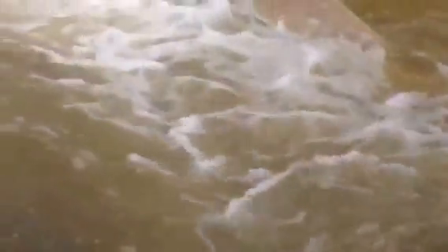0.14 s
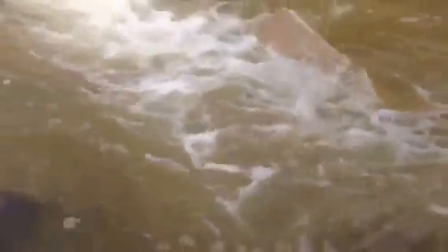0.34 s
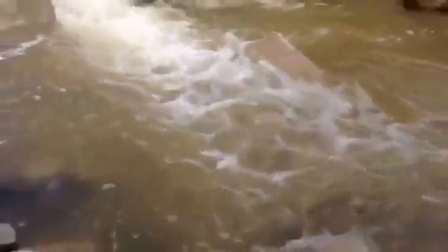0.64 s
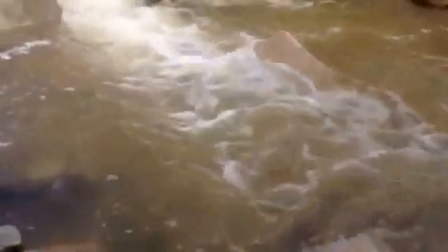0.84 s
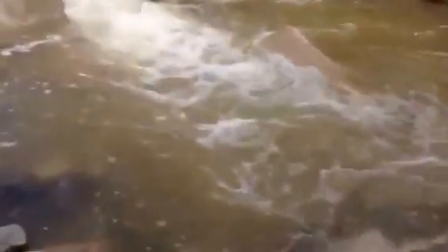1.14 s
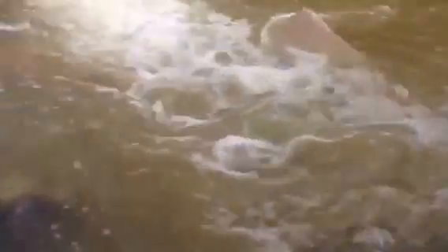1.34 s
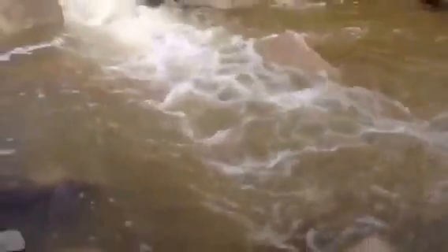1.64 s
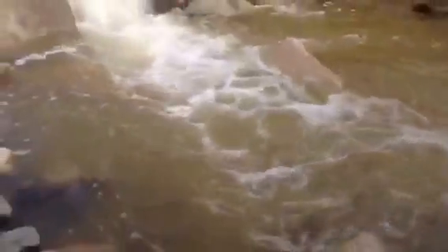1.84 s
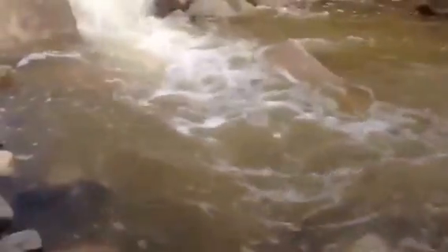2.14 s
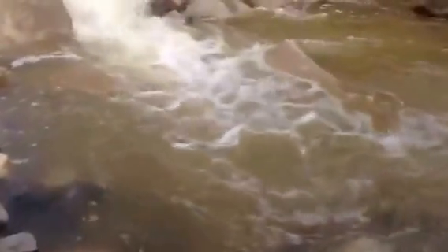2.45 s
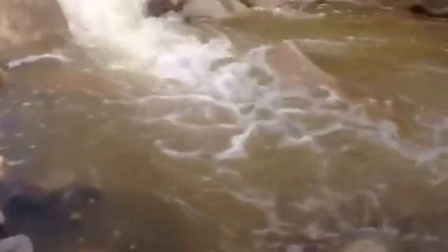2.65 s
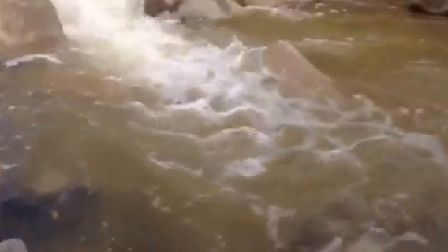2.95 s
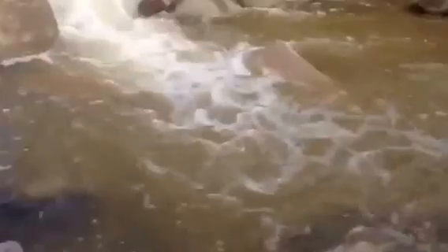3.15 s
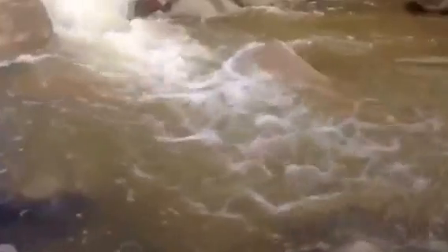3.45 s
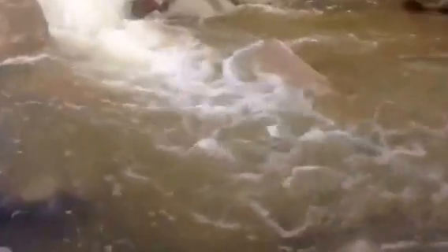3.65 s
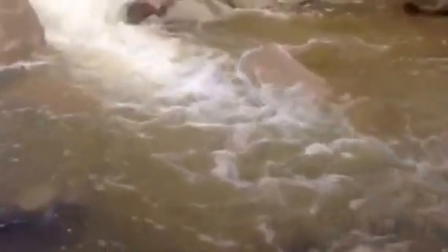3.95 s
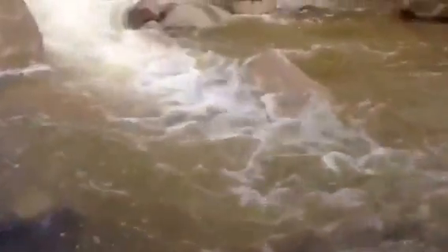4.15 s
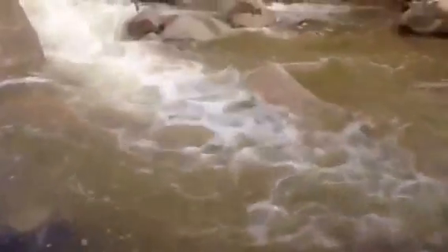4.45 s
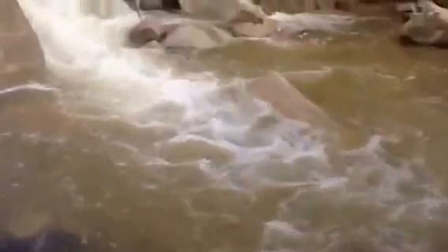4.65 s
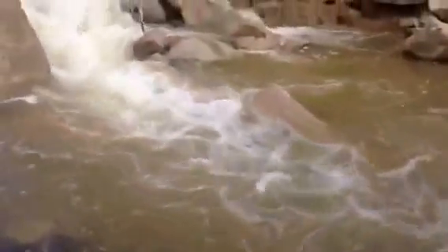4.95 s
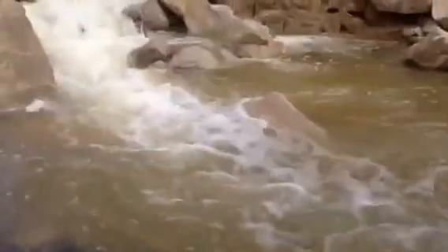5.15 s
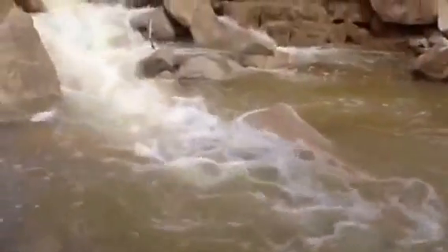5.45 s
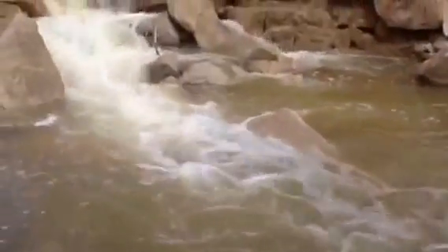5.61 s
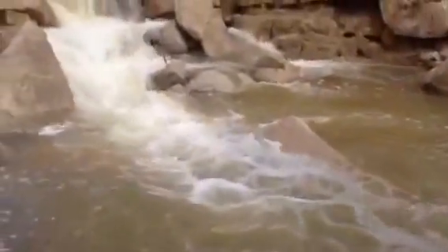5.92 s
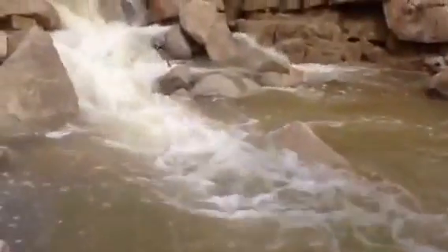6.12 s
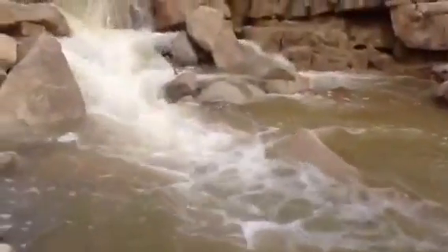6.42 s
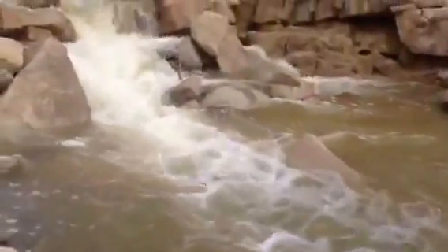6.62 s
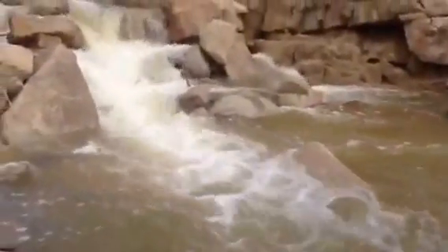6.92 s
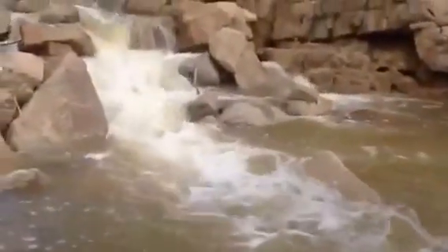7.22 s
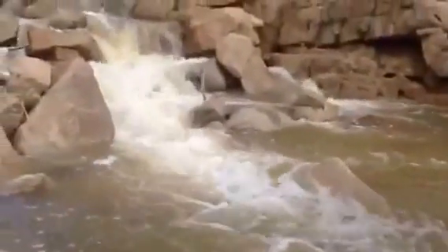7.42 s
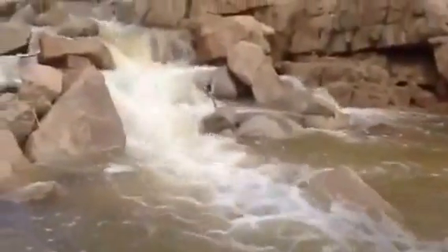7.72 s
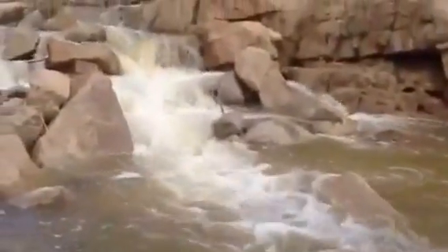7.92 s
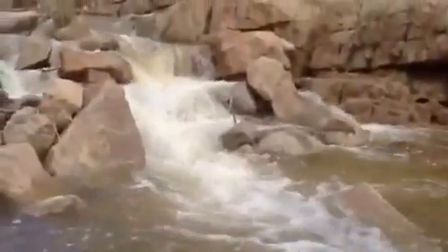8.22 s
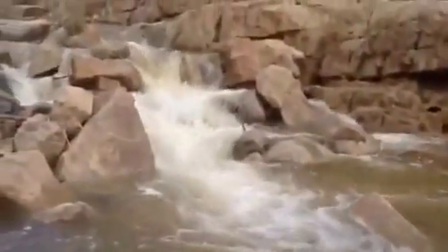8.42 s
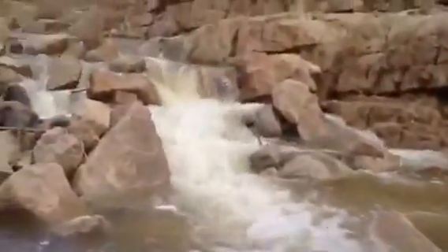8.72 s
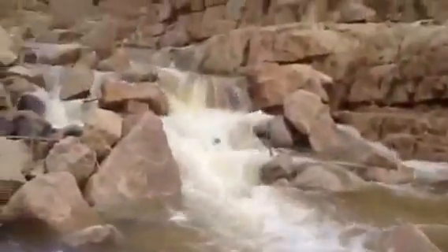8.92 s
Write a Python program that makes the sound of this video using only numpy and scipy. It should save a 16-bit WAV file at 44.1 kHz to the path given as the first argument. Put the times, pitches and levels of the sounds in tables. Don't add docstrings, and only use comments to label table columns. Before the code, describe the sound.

A steady torrent of muddy water pours over boulders into a churning pool. A low, airy roar sits beneath thick gurgling and smaller, busier bubbling, with fine spray hissing on top. It is already at full force at the start and never stops, only wavering slightly. Outdoors on the rocky bank, one small microphone, nearly mono and dry, with faint early reflections from nearby rocks and a dulled extreme top.

```python
import sys
import numpy as np
from scipy import signal
from scipy.fft import rfft, irfft, next_fast_len
from scipy.io import wavfile
from scipy.ndimage import uniform_filter1d, map_coordinates

SR = 44100
rng = np.random.default_rng(int(sys.argv[2]) if len(sys.argv) > 2 else 0)


def unload_audio(sound):
    columns = np.transpose(np.atleast_2d(sound))
    steps = np.round(np.clip(columns, -1, 1) * 32767)
    wavfile.write(sys.argv[1], SR, steps.astype(np.int16))


def elevation(decibels):
    levels = np.asarray(decibels, float)
    return 10 ** (levels / 20)


N = 399987


def unit(x):
    return x / np.sqrt(np.mean(x ** 2) + 1e-20)


def curve(rows):
    s, value = np.transpose(rows)
    return np.interp(np.arange(N) / SR, s, value)


def wobble(rate):
    knots = rng.standard_normal(int(N * rate / SR) + 4)
    return map_coordinates(knots, [np.arange(N) * rate / SR])


def coloured(x, spectrum):
    m = next_fast_len(N + 8192)
    hz, db = np.transpose(spectrum)
    log_hz = np.log(np.fft.rfftfreq(m, 1 / SR) + 1)
    gain = elevation(np.interp(log_hz, np.log(hz + 1), db))
    return unit(irfft(rfft(x, m) * gain, m)[:N])


def patchy(patch_db, drift_db):
    z = signal.stft(rng.standard_normal(N + 512), nperseg=512)[2]

    def blur(rows, cols):
        field = uniform_filter1d(rng.standard_normal(z.shape), rows, 0)
        return unit(uniform_filter1d(field, cols, 1))

    field_db = patch_db * blur(rows=8, cols=12) + drift_db * blur(rows=3, cols=250)
    return unit(signal.istft(z * elevation(field_db), nperseg=512)[1][:N])


def bubbles(count, low_hz, high_hz, cycles, spread_db, size):
    draw = rng.random((count, 3))
    hz = low_hz + (high_hz - low_hz) * draw[:, 1:2]
    turns = hz * np.arange(size) / SR
    tone = np.sin(2 * np.pi * turns * (1 + 0.031 * turns / cycles))
    envelope = np.exp(-turns / cycles) * (1 - np.exp(-turns / 0.55))
    strength = elevation(-spread_db * np.log(1 - .98 * draw[:, 2:])) * np.sqrt(hz)
    where = (draw[:, :1] * N).astype(int) + np.arange(size)
    return unit(np.bincount(where.ravel(), (tone * envelope * strength).ravel(), N + size)[:N])


def blend(noise, grains, share):
    share = np.clip(share, 0, 1)
    return np.sqrt(1 - share) * noise + np.sqrt(share) * grains


# frequency in Hz, level in dB per Hz.
ROAR_SPECTRUM = [(25, -33), (45, -24), (65, -11.5), (90, -11), (120, -4.5), (150, 0.5), (180, -0.5),
                 (230, -5.5), (300, -7.0), (370, -11.5), (417, -16), (443, -27), (473, -120.0)]


def roar(level_db):
    return elevation(level_db) * coloured(patchy(patch_db=0.34, drift_db=0.5), ROAR_SPECTRUM)


# frequency in Hz, level in dB per Hz.
GURGLE_SPECTRUM = [(387, -120.0), (417, -14), (443, -8), (490, -2), (560, -2.5), (660, -2), (745, 1.5),
                   (810, -1.5), (880, -0.5), (1000, -4.5), (1164, -6), (1236, -11.5), (1320, -120.0)]


def gurgle(level_db):
    bed = patchy(patch_db=.2, drift_db=.6)
    rings = bubbles(count=4000, low_hz=400, high_hz=1300, cycles=6, spread_db=1.2, size=900)
    return elevation(level_db) * coloured(blend(bed, rings, share=.04), GURGLE_SPECTRUM)


# frequency in Hz, level in dB per Hz.
CHURN_SPECTRUM = [(1080, -120.0), (1164, -5), (1236, 0), (1350, 1), (1500, 1), (1700, -0.5), (1950, -1),
                  (2200, -1), (2350, -2.5), (2550, -2.5), (2813, -5), (2987, -10), (3190, -120.0)]


def churn(level_db):
    bed = patchy(patch_db=.5, drift_db=.6)
    rings = bubbles(count=9000, low_hz=1100, high_hz=3100, cycles=6, spread_db=2, size=400)
    return elevation(level_db) * coloured(blend(bed, rings, share=.07), CHURN_SPECTRUM)


# frequency in Hz, level in dB per Hz.
SPRAY_SPECTRUM = [(2610, -120.0), (2813, -21), (2987, -2.5), (3300, -1), (3850, -1), (4300, -3.5),
                  (5150, -3), (5800, -7), (6300, -6), (7000, -6.5), (7800, -6), (8300, -8.5), (9200, -10),
                  (10200, -13.5)]


def spray(level_db, bright_db):
    bed = patchy(patch_db=0.67, drift_db=.6)
    drops = bubbles(count=25000, low_hz=2674, high_hz=10960, cycles=3.05, spread_db=2, size=110)
    hiss = coloured(blend(bed, drops, share=.15), SPRAY_SPECTRUM)
    sharper = unit(-np.gradient(np.gradient(hiss)))
    hiss = hiss + np.clip(bright_db, -2, 2) / 12 * (sharper - hiss)
    return elevation(level_db) * hiss


# centre in seconds, level in dB, brightness in dB an octave.
SPLASHES_OF_SPRAY = [(.05, 1, 1), (.8, .6, -0.5), (1.02, 0.3, -1), (2.1, -1, .1), (3.6, 0.5, -1.5),
                     (4.6, -0.7, -0.5), (5.2, -0.5, .6), (6.6, .7, -0.5), (7.6, 1, 0), (8.2, 0.8, -1),
                     (8.9, 0.2, 1.5)]


def flares():
    t = np.arange(N) / SR
    s, level_db, bright_db = np.transpose(SPLASHES_OF_SPRAY)
    half_length_s = 0.1
    coarse = t[::64]
    bells = np.exp(-.5 * ((coarse[:, None] - s) / half_length_s) ** 2)
    turn = t - t.mean()
    spray_db = -40.5 + 0.04 * turn + np.interp(t, coarse, bells @ level_db)
    return spray_db, 0.1 + 0.1 * turn + np.interp(t, coarse, bells @ bright_db)


# time in seconds, plunge strength in dB.
PLUNGE_STRENGTH = [(0.0, -35.5), (0.25, -35), (0.3, -32.5), (0.66, -34.5), (4.07, -33.5), (4.14, -32.5),
                   (4.19, -41), (4.22, -35), (5.0, -34.5), (5.13, -37.5), (5.3, -34.5), (7.15, -35.5),
                   (8.21, -34), (8.26, -38.5), (8.36, -36.5), (9.07, -35)]
# time in seconds, froth in dB.
SURFACE_FROTH = [(0.0, -38), (0.17, -36.5), (0.91, -37.5), (1.01, -36), (1.11, -38.5), (1.21, -35.5),
                 (1.24, -37.5), (2.3, -36), (2.4, -38), (2.88, -36.5), (3.28, -37.5), (5.3, -36.5),
                 (5.43, -38.5), (5.51, -36.5), (7.4, -37), (7.55, -37.5), (8.03, -36), (9.07, -38.5)]


def flood():
    roar_db = curve(PLUNGE_STRENGTH) + 1
    push_db = roar_db - roar_db.mean()
    froth_db = curve(SURFACE_FROTH)
    froth_db = froth_db - froth_db.mean()
    surge = 0.34 * wobble(10) + 0.61 * wobble(22)
    gurgle_db = -38.5 + 1.3 * froth_db + 0.17 * push_db
    churn_db = -41 + 0.75 * froth_db + .05 * push_db
    spray_db, bright_db = flares()
    spray_db = spray_db + .3 * froth_db
    return (roar(roar_db + .1 * surge) + gurgle(gurgle_db + 0.27 * surge)
            + churn(churn_db + .5 * surge) + spray(spray_db + 0.66 * surge, bright_db))


# delay in seconds, level in dB.
BOULDER_ECHOES = [
    (.0047, -25),
    (.009, -31.5),
]


def scene():
    water = flood()
    heard = water.copy()
    for delay_s, db in BOULDER_ECHOES:
        heard += elevation(db) * np.roll(water, round(delay_s * SR))
    return np.array([heard, heard])


# from Hz, to Hz, share of time present, level in dB.
TOP_BANDS = [(10560, 10680, .5, -4), (10680, 10820, .03, -9), (10820, 10920, .2, -8),
             (10920, 11150, 0, -13)]


def speckled(x, speckle_db):
    hz, t, z = signal.stft(x, SR, window="cosine", nperseg=2048)
    same_power = elevation(speckle_db ** 2 * np.log(10) / 40)
    z = z * elevation(speckle_db * rng.standard_normal(z.shape)) / same_power

    def flicker(share):
        return np.repeat(rng.random(len(t)), 2)[:len(t)] < share

    busy = flicker(.07)
    for from_hz, to_hz, share, db in TOP_BANDS:
        z[(hz > from_hz) & (hz <= to_hz)] *= elevation(db) * (busy | flicker(share))
    z[hz > TOP_BANDS[-1][1]] = 0
    return signal.istft(z, SR, window="cosine", nperseg=2048)[1][:N]


# time in seconds, centre frequency in Hz.
WIDE_MOMENTS = [(0.876, 7560), (1.643, 6270), (2.084, 4650), (2.084, 8970), (2.525, 8940), (3.245, 5120),
                (3.779, 6920), (4.313, 4680), (4.313, 8270), (5.287, 7550), (6.263, 5160), (7.587, 6260),
                (8.121, 5410), (8.121, 7540), (8.214, 10660), (8.283, 9650)]


def ear_difference(mono):
    side, size = np.zeros(N), 2048
    fade, hz = signal.windows.hann(size), np.fft.rfftfreq(size, 1 / SR)
    for s, centre_hz in WIDE_MOMENTS:
        middle = round(s * SR)
        frame = slice(middle - size // 2, middle + size // 2)
        width_hz = min(1350, .21 * centre_hz)
        band = abs(hz - centre_hz) < width_hz / 2
        other = rfft(mono[::-1][frame]) * band
        side[frame] += elevation(-1.5) * fade * irfft(other)
    return side


def low_pass(x):
    return signal.sosfilt(signal.butter(12, 11540, fs=SR, output="sos"), x)


def record(dry):
    mono = speckled(dry[0], speckle_db=2.16)
    side = ear_difference(mono)
    return low_pass(mono + np.array([side, -side]))


dry = scene()
out = record(dry)
unload_audio(out)
```